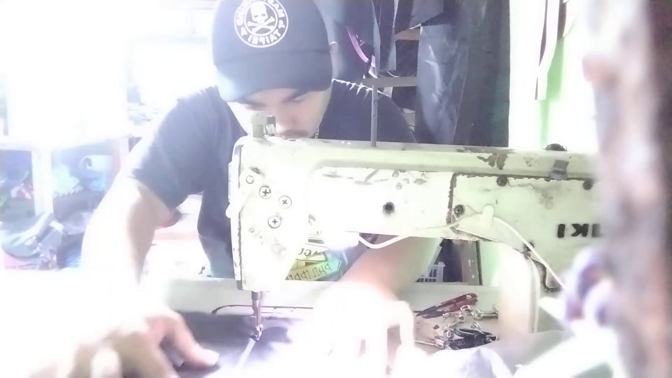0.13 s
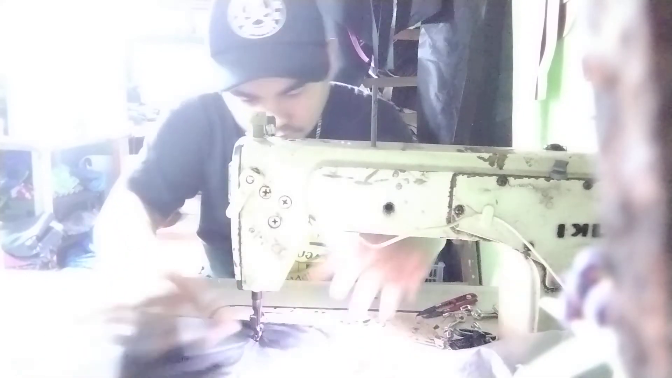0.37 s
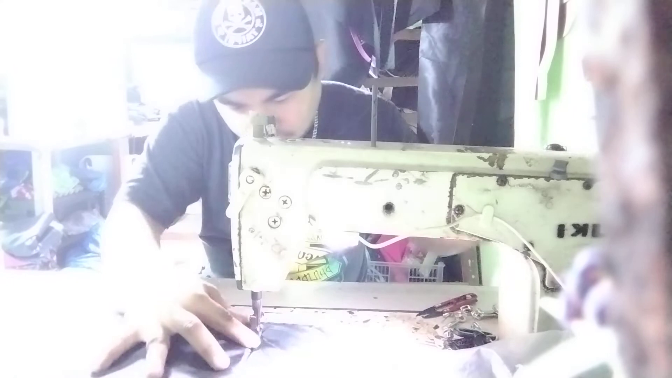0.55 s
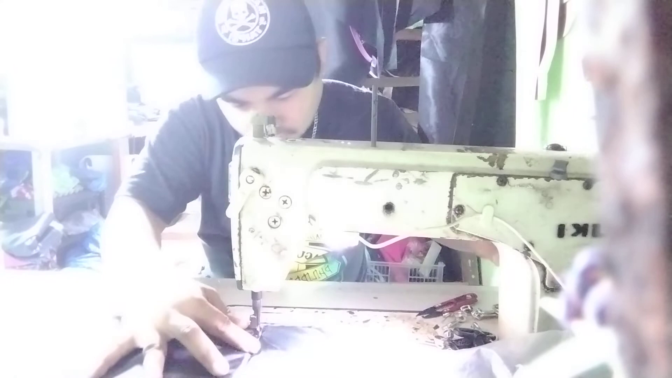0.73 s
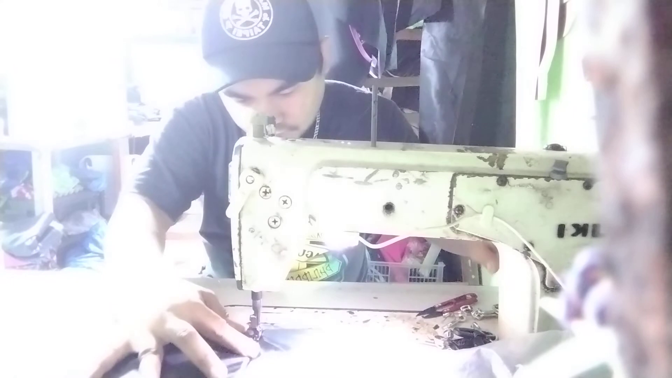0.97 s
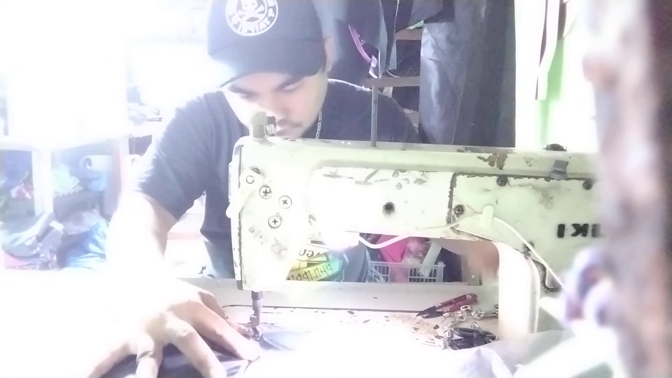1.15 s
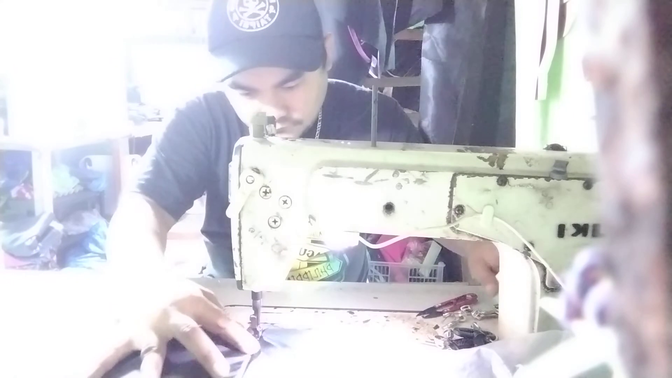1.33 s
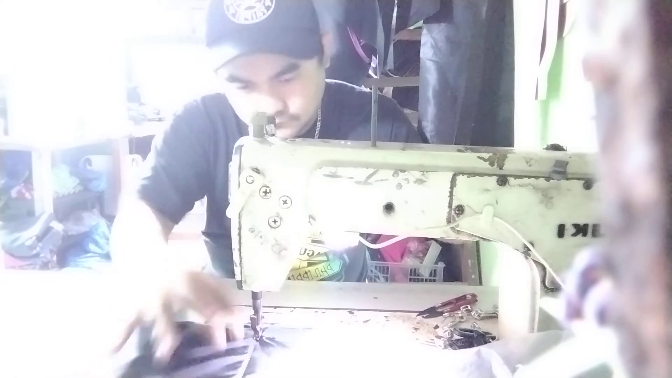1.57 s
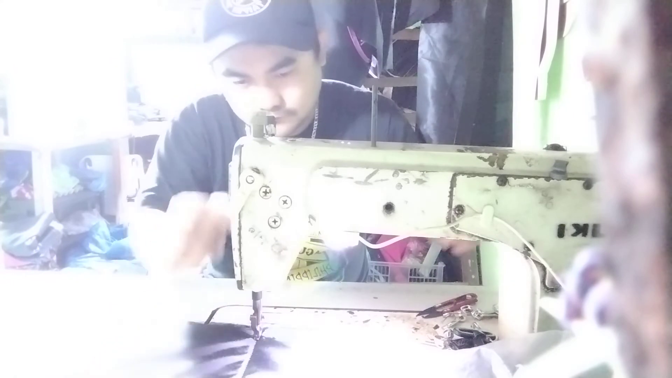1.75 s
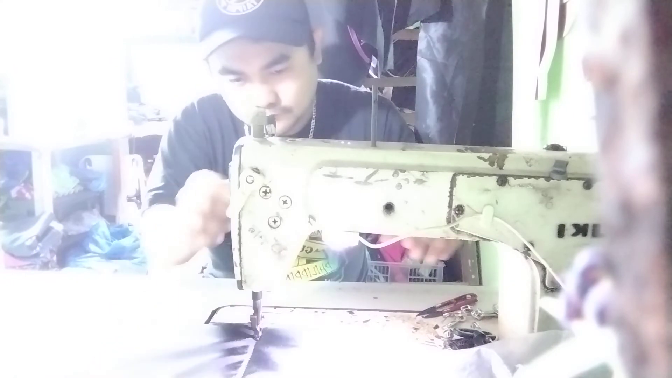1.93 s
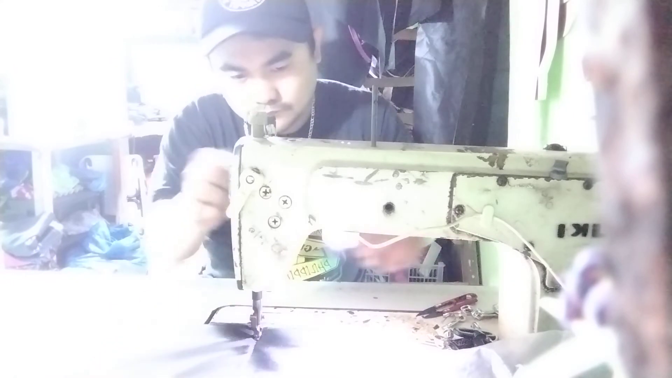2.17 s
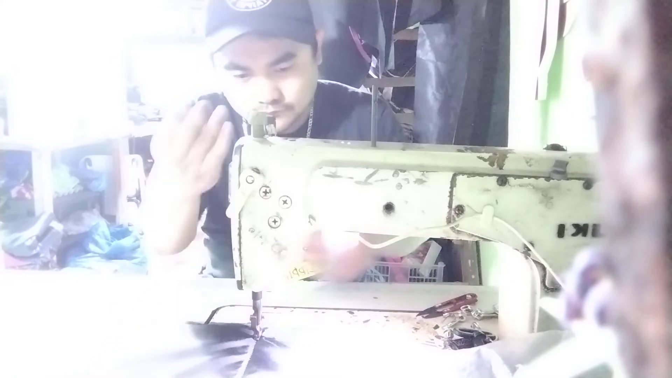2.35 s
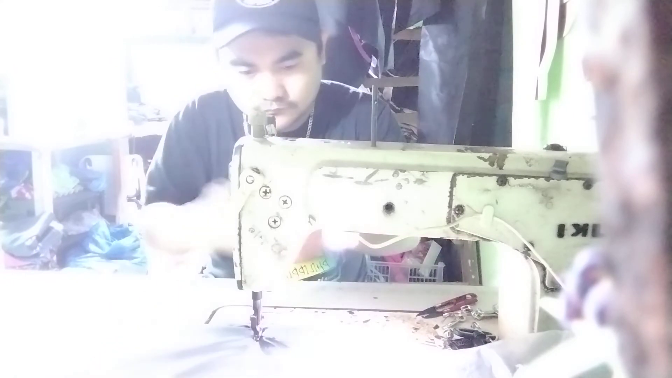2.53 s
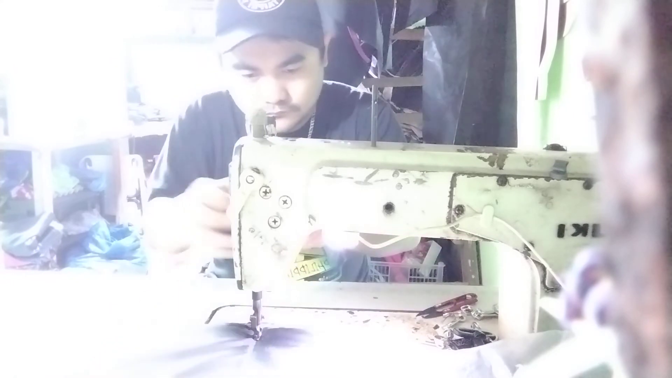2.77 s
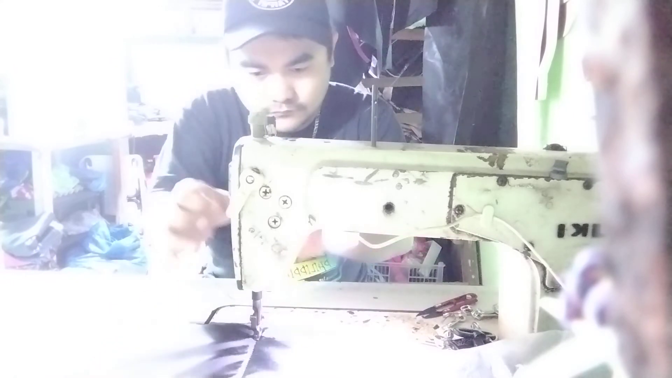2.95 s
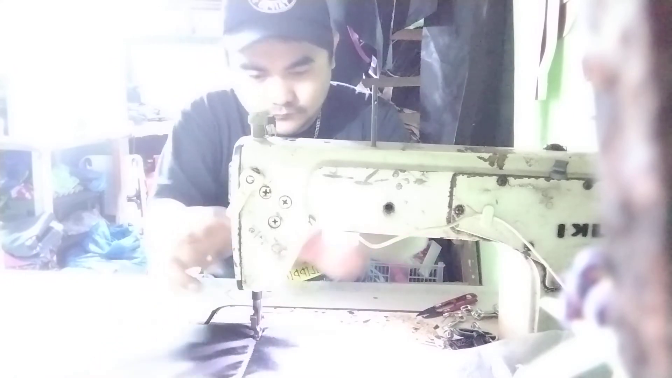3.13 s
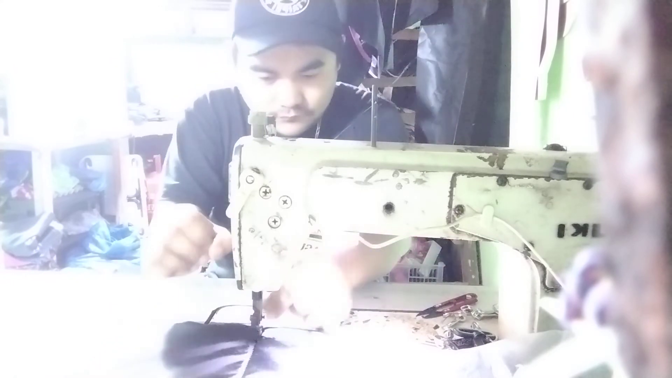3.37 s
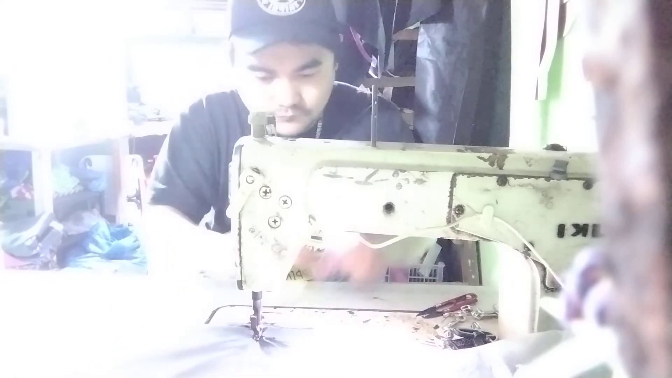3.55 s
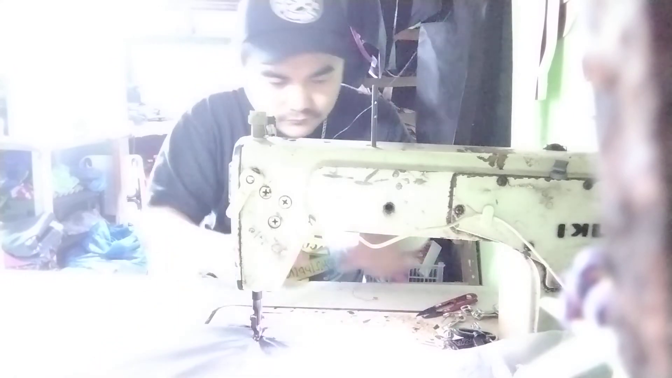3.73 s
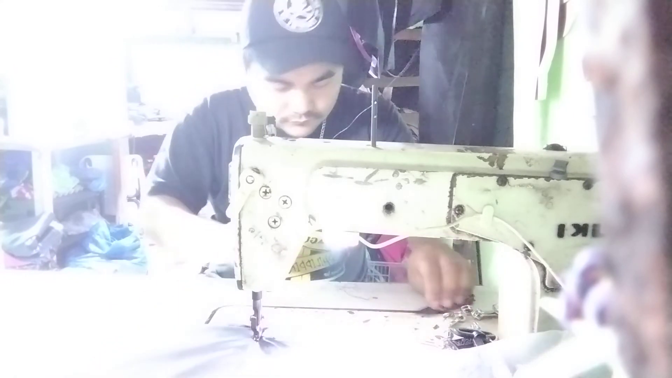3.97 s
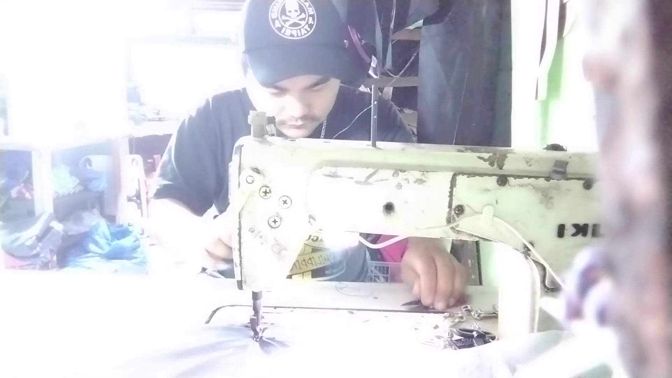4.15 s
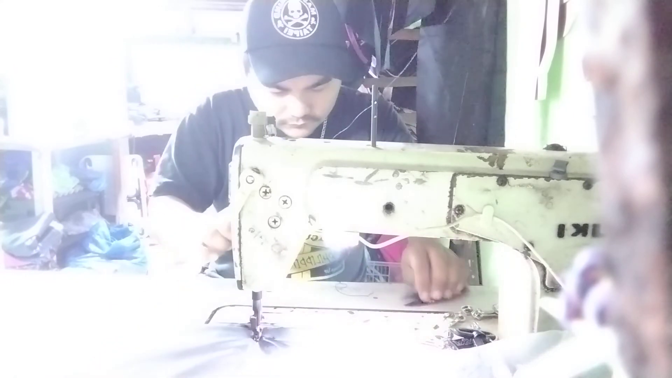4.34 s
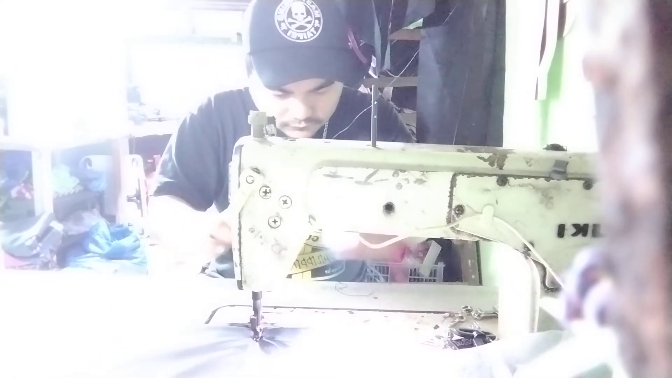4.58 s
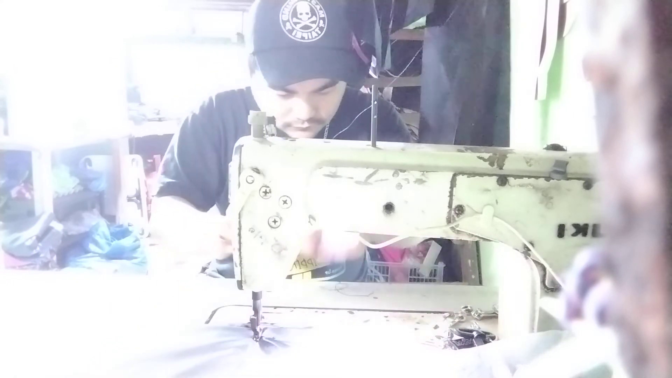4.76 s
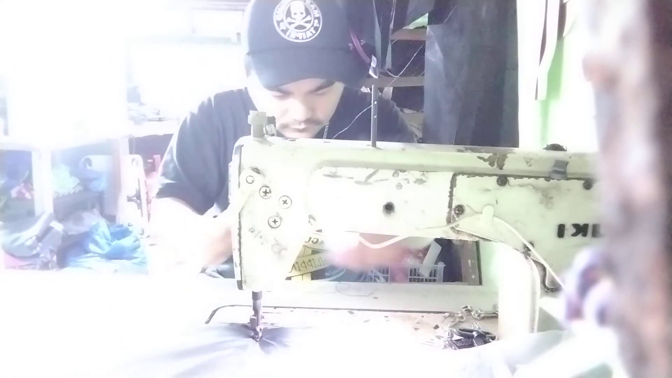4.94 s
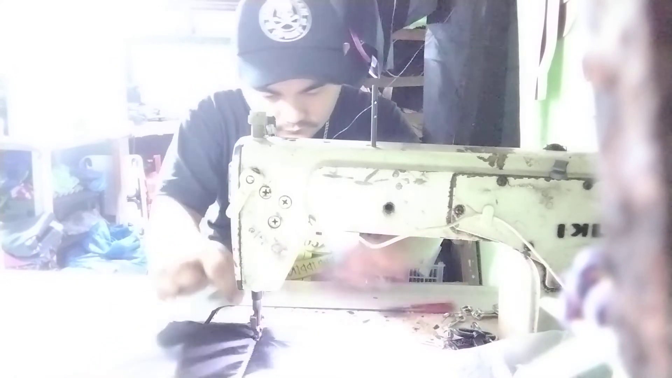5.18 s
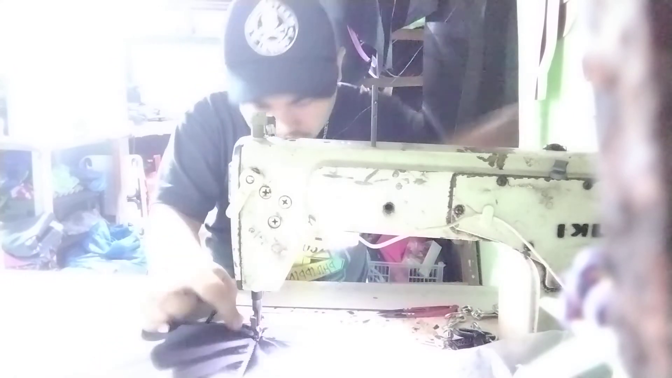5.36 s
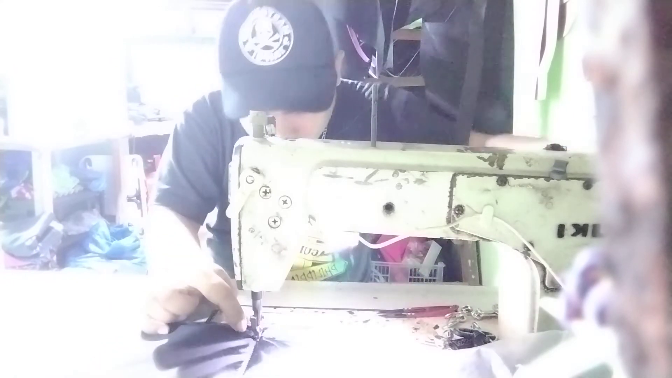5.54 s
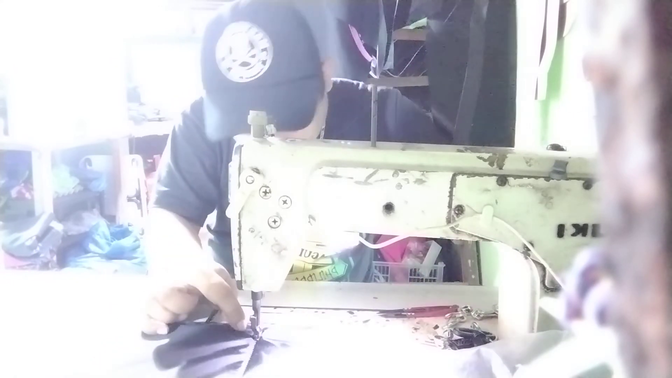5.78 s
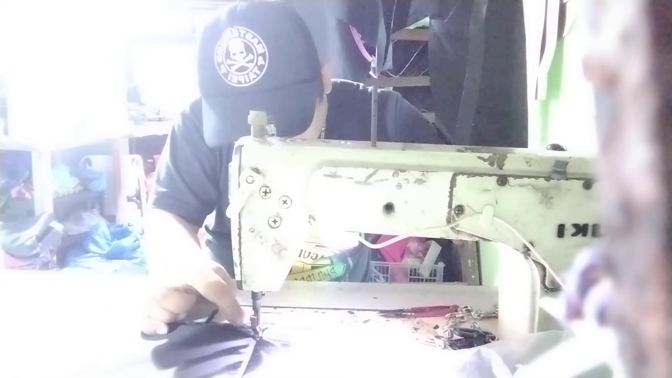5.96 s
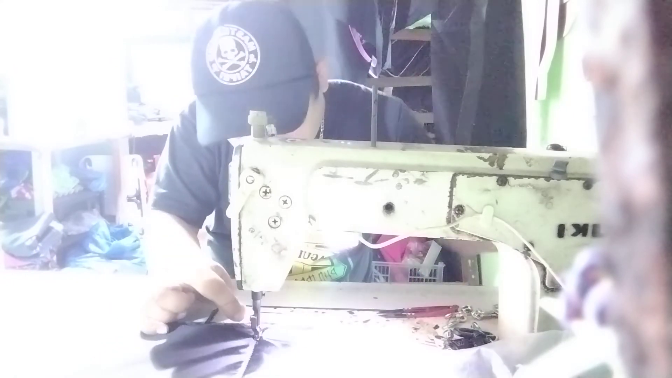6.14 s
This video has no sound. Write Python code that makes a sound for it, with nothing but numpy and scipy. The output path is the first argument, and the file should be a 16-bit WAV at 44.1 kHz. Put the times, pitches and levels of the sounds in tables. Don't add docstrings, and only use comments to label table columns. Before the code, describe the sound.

An industrial sewing machine rattles through a fast seam, stitches a slower clacking run and stops, leaving faint motor hum, hiss and scattered tool knocks.

```python
import sys
import numpy as np
from scipy import signal
from scipy.fft import rfft, irfft, next_fast_len
from scipy.io import wavfile
from scipy.ndimage import uniform_filter1d, map_coordinates

SR = 44100
rng = np.random.default_rng(int(sys.argv[2]) if len(sys.argv) > 2 else 0)


def boost(x):
    u = np.asarray(x, float) / 20
    return 10 ** u


def inscribe(sig):
    pcm = np.round(np.clip(np.atleast_2d(sig).T, -1, 1) * 32767)
    wavfile.write(sys.argv[1], SR, pcm.astype(np.int16))


N = 273420
TIME = np.arange(N) / SR
# (time [s], turns made [1])
FAST_SHAFT = [(-.006, 0), (.0494, 3), (.1606, 9), (.2165, 12), (.2552, 14), (.296, 16), (.321, 17),
              (.3796, 19), (.44, 20)]
FAST_END = FAST_SHAFT[-1][0]
# (time [s], peak level [dB], ring frequency [Hz])
SLOW_STITCHES = [(0.5856, -24, 2275), (0.688, -32, 1250), (0.7423, -7.5, 1540), (0.7864, -6.5, 1430),
                 (0.82, -6, 1187), (0.855, -5.5, 1785), (0.8907, -4.5, 1430), (0.927, -20, 1390),
                 (0.9652, -21, 1440), (1.0055, -21, 1510), (1.044, -12, 1734), (1.0874, -12, 1690),
                 (1.135, -37, 1310), (1.176, -28, 1870), (1.213, -20, 1750), (1.2893, -30, 1810),
                 (1.369, -26, 1845)]
# (time [s], level [dB])
FAST_PEDAL = [(0.0, -18.5), (0.16, -18.5), (0.334, -21.5), (0.526, -60), (0.596, -45), (0.66, -60)]
# (time [s], level [dB])
SLOW_PEDAL = [(0.689, -34.5), (0.752, -36), (0.796, -27.5), (0.842, -29.5), (1.108, -34.5), (1.238, -39.5),
              (1.454, -56), (1.8, -62)]
# (frequency [Hz], density [dB per Hz])
RATTLE_SPECTRUM = [(2060, -3.5), (3500, -17), (4290, 3.5), (5780, -2.5), (10100, 3), (11100, -5.5),
                   (14900, -13.5), (16000, -27)]
BRAKING_S = .24


def unit(x):
    return x / np.sqrt(np.mean(x ** 2) + 1e-20)


def along(points, hz):
    f, v = np.transpose(points)
    return np.interp(np.log(hz + 1), np.log(f + 1), v, left=-120, right=-120)


def curves(rows):
    s, *cols = np.transpose(rows)
    return [np.interp(TIME, s, c) for c in cols]


def filtered(x, response):
    m = next_fast_len(len(x) + 8192)
    return irfft(rfft(x, m) * response(np.fft.rfftfreq(m, 1 / SR)), m)[:len(x)]


def shaped(x, spectrum):
    return filtered(x, lambda hz: boost(along(spectrum, hz)))


def place(out, s, sound):
    out[round(s * SR):][:len(sound)] += sound


def bell(centre_hz, octaves):
    ripple = rng.standard_normal(200)

    def response(hz):
        modes = boost(3.5 * np.interp(hz / 120, np.arange(200), ripple))
        distance = np.abs(np.log2((hz + 1) / centre_hz) / octaves)
        return modes / np.sqrt(hz + 50) * np.exp(-.5 * distance ** 3)

    return response


def smoothed(field, bands, frames):
    return uniform_filter1d(uniform_filter1d(field, bands, axis=0), frames, axis=1)


def rush(spectrum, patchy_db, size=(2, 12), ceiling=4):
    z = signal.stft(rng.standard_normal(N), nperseg=512)[2]
    field = unit(smoothed(rng.standard_normal(z.shape), *size))
    x = signal.istft(z * boost(patchy_db * np.minimum(field, ceiling)), nperseg=512)[1][:N]
    return unit(shaped(x, spectrum))


def steady(x, sounding):
    return x / np.sqrt(np.abs(uniform_filter1d(x * x, 4000)) + 1e-3 * np.mean(x[sounding] ** 2))


def wobble(rate):
    return map_coordinates(rng.standard_normal(400), [TIME * rate])


def window(start, length, fade):
    return np.clip(np.minimum(TIME - start + fade, start + length + fade - TIME) / fade, 0, 1)


def shaft():
    s, turns = np.transpose(FAST_SHAFT)
    later = np.transpose(SLOW_STITCHES)[0]
    s = np.concatenate([s, later, [later[-1] + 0.45]])
    return s, np.concatenate([turns, turns[-1] + 1 + np.arange(len(later) + 1)])


def effort():
    # (time [s], length [s], level [dB])
    shakes = [
        (0.39, 0.18, 7.5),
        (0.72, 0.07, -8),
        (0.88, 0.075, 7),
        (1.224, 0.079, 6),
    ]
    casting_db, = curves(FAST_PEDAL + SLOW_PEDAL)
    speed = uniform_filter1d(np.gradient(np.interp(TIME, *shaft())) * SR, size=1500)
    drive_db = 0.34 * (casting_db + 30) + 0.64 * 20 * np.log10(np.abs(speed) / 27 + 0.027)
    shake_db = sum(db * np.exp(-.5 * ((TIME - s) / length) ** 2) for s, length, db in shakes)
    lag_s = 0.036
    thump_db = -37 + np.interp(TIME - lag_s, TIME, drive_db) + shake_db
    return casting_db, thump_db, -44.5 + 0.96 * (casting_db + 29.5)


def strikes(s, turns):
    # (share of turn [1], level [dB])
    contacts = [(0, 0), (.27, -4), (.58, -12), (.8, -13)]
    whole = np.arange(int(turns[-1]) - 1)
    blows = np.zeros(N)
    for share, db in contacts:
        at = np.interp(whole + share + rng.normal(0, 0.006, len(whole)), turns, s)
        strength = boost(db + rng.normal(0, 1.3, len(whole)))
        blows[np.clip(at * SR, 0, N).astype(int)] += (at > -.003) * strength
    return blows


def joint_chatter(blows, turn, s, turns):
    fast = TIME < FAST_END
    since = TIME - np.interp(np.floor(turn), turns, s)
    habit = rng.standard_normal(N)[(since * SR).astype(int)]
    alike = 0.64 * fast
    shake = np.where(fast, signal.lfilter([1], [1, -.994], blows), signal.lfilter([1], [1, -.997], blows))
    shake = unit(shake + np.where(fast, .11, .13) * shake.max())
    return shake * (alike * habit + np.sqrt(1 - alike ** 2) * rng.standard_normal(N))


def casting_response(f):
    # (frequency [Hz], width [Hz], level [dB])
    casting_modes = [(326, 20.4, 4.5), (529, 101, 1), (750, 80, 1), (900, 137, 1), (1326, 150, 6),
                     (1600, 132, 5.5), (1926, 250, 3.5), (2220, 102, 2.5), (2550, 280, -3),
                     (2900, 134, 2.5), (3165, 260, -3), (3750, 390, -6), (4220, 1160, -12.5)]
    modes = sum((-1) ** k * boost(db) * 1j * f * width / (hz * hz - f * f + 1j * f * width)
                for k, (hz, width, db) in enumerate(casting_modes))
    return modes / (1 + 1j * f / 4600) ** 2


def table_thump(turn):
    # (multiple of shaft speed [1], level [dB])
    shaft_orders = [(1, -12), (2, 2), (3, -11), (4, -3.5), (5, -11), (6, -17), (7, -4), (9, -10), (10, -1),
                    (14, -15), (17, -10.5)]
    # (frequency [Hz], density [dB per Hz])
    table_spectrum = [(18, -66), (48, 3), (68, -30), (97, -6.5), (129, -1), (283, -9.5), (324, -7.5),
                      (402, -4), (450, -2.5), (580, -21), (990, -120)]
    orders = sum(boost(db) * ((k < 8) | (TIME < FAST_END)) * np.sin(k * 2 * np.pi * turn + k * k)
                 for k, db in shaft_orders)
    loose_db = np.interp(TIME, [BRAKING_S, .36], [-8.5, -3.5])
    thump = boost(-3.5) * unit(orders) + boost(loose_db) * rush(table_spectrum, patchy_db=3.0)
    dull = filtered(thump, lambda hz: 1 / (1 + (hz / 294) ** 6) / (1 + (70 / (hz + 1)) ** 3))
    return np.where(TIME < FAST_PEDAL[-1][0], thump, dull)


def machine():
    s, turns = shaft()
    casting_db, thump_db, rattle_db = effort()
    turn = np.interp(TIME, s, turns)
    blows = strikes(s, turns)
    chatter = joint_chatter(blows, turn, s, turns)
    sounding = TIME < 1.5
    sewing = 2 * SR
    struck, loose = (np.pad(filtered(x[:sewing], casting_response), (0, N - sewing))
                     for x in (blows, chatter))
    struck = struck * boost(np.interp(TIME, [.33, .345, FAST_END, FAST_END], [14, 9, 7, -11]))
    casting = steady(unit(struck) + boost(3) * unit(loose), sounding)
    rattle = steady(shaped(chatter, RATTLE_SPECTRUM), sounding)
    thump = table_thump(turn)
    running = np.clip((1.8 - TIME) / 0.32, 0, 1)
    whole = running * (boost(casting_db) * casting + boost(rattle_db) * rattle + boost(thump_db) * thump)
    return filtered(whole, lambda hz: 1 / (1 + (75 / (hz + 1)) ** 4))


def stitches():
    # (frequency [Hz], peak level [dB])
    arm_modes = [(1340, -16), (1610, -6), (1850, -9), (3250, -16), (4050, -24.5)]
    out, t = np.zeros(N + SR), np.arange(2000) / SR

    def ring(hz, t60):
        return boost(-60 * t / t60) * (1 - np.exp(-t / 0.0025)) * np.sin(2 * np.pi * hz * t)

    for s, db, hz in SLOW_STITCHES:
        place(out, s, boost(db - 7.0) * ring(hz, 0.036))
    for s in np.interp(np.arange(1, 18), *np.transpose(FAST_SHAFT)[::-1]):
        eased_db = -3 * (s > BRAKING_S)
        stroke = sum(boost(db + eased_db + rng.normal(0, 3)) * ring(hz, 0.021) for hz, db in arm_modes)
        place(out, s, stroke)
        place(out, s + .005, boost(-7.5) * stroke)
    return out[:N]


def bed():
    out, t = np.zeros(N + SR), np.arange(5000) / SR
    effort_db, = curves(SLOW_PEDAL)
    draws = rng.standard_normal((len(SLOW_STITCHES), 2))
    for (s, *_), (size, pitch) in zip(SLOW_STITCHES[3:], draws):
        hz, t60 = 562 * (1 + .03 * pitch), 0.086
        ring = boost(-60 * t / t60) * (1 - np.exp(-t / 0.0031)) * np.sin(2 * np.pi * hz * t)
        place(out, s, boost(effort_db[round(s * SR)] + 5 + size) * ring)
    return out[:N]


def taps():
    # (time [s], peak level [dB], centre [Hz], width [octaves])
    sharp_taps = [(0.763, -19, 3500, 1.6), (.746, -28.5, 2900, 0.2), (.892, -24, 1700, 0.51),
                  (0.93, -37, 2740, 0.19), (1.046, -23.5, 2280, 0.29), (1.087, -21.5, 2060, 0.59),
                  (1.137, -29, 1680, 0.41), (1.186, -28, 5100, 1.7), (1.588, -31, 2500, 0.28),
                  (2.891, -24, 1980, 0.67), (2.907, -30, 1230, 0.89), (4.27, -25.5, 1600, 0.21),
                  (4.909, -28.5, 3100, 0.21), (5.171, -26, 2830, 0.12), (5.172, -33.5, 5100, 0.13),
                  (5.2, -17.5, 2000, 0.88), (5.2005, -21.5, 9700, 0.83), (5.2185, -30, 12100, .5),
                  (5.2335, -36, 9000, .5), (5.316, -42, 11000, .6), (5.279, -35, 2900, .2),
                  (1.5885, -31.5, 3300, 0.12), (5.2015, -15, 1900, 0.4), (5.279, -35, 2170, 0.46),
                  (5.383, -40.5, 1830, 0.035), (5.673, -22, 1790, 0.17)]
    out, t = np.zeros(N + SR), (np.arange(2048) - 512) / SR
    for s, db, hz, octaves in sharp_taps:
        returns = .25 * (t > 0) * boost(-60 * np.abs(t) / .02) * rng.standard_normal(len(t))
        tap = filtered((t == 0) + returns, bell(hz, octaves))
        place(out, s - 512 / SR, boost(db) * tap / np.abs(tap).max())
    return out[:N]


def blows_on_table():
    # (time [s], peak level [dB], centre [Hz], width [octaves], crack level [dB])
    ticks = [(0.687, -27, 1500, 0.88, -34.5), (0.763, -25.5, 2900, 0.46, -30),
             (.85, -26.5, 2960, 0.88, -32.5), (1.531, -40, 2200, 0.2, -41), (1.586, -34, 2130, 0.7, -41),
             (4.885, -37, 2860, 0.095, -67), (4.905, -43, 3270, 0.28, -38), (5.217, -31, 1730, 0.35, -27),
             (5.232, -45, 1500, .7, -49.5), (5.315, -50, 1790, 0.66, -40), (5.385, -38, 3400, 0.54, -45)]
    # (time [s], peak level [dB], centre [Hz], width [octaves], crack level [dB])
    clacks = [(.568, -28, 750, 0.43, -82), (.587, -33.5, 615, 0.54, -72), (0.698, -24, 376, 1, -70),
              (1.485, -34, 990, 0.3, -43.5), (1.549, -31.5, 925, 0.37, -43.5),
              (2.87, -24.5, 2330, 0.55, -49), (2.876, -19.5, 1080, 0.78, -34), (2.886, -32, 1700, 2, -58),
              (2.995, -38.5, 1600, 0.93, -65), (4.257, -30, 1680, 0.1, -60), (4.265, -28, 1480, 0.27, -45),
              (5.172, -29.5, 2630, 0.67, -36), (5.198, -20.5, 1400, 1.34, -24.5),
              (5.277, -26, 1380, 1.15, -35.5), (5.679, -29, 1750, 0.22, -43), (5.94, -22, 654, 0.14, -43),
              (6.034, -25.5, 653, 0.16, -45), (6.052, -41, 2200, 0.3, -40.5)]
    # (time [s], peak level [dB], centre [Hz], width [octaves], t60 [s])
    rings = [(1.137, -32.5, 290, 0.18, 0.64), (1.36, -39, 1740, 0.13, 1), (1.597, -34.5, 1950, 0.14, 0.4),
             (4.812, -50, 3300, 0.2, 0.15), (2.879, -27.5, 510, 0.28, 0.28), (5.278, -29, 1650, 0.15, 0.19),
             (5.201, -23, 1780, 0.87, 0.19), (5.157, -43, 2150, 0.14, .15),
             (1.586, -21.5, 1920, 0.14, 0.091), (4.006, -40, 1605, 0.08, 0.55),
             (4.817, -28.5, 842, 0.047, 0.2), (4.818, -32.5, 1114, 0.079, 0.48),
             (5.168, -32.5, 825, 0.1, 0.25), (5.345, -34, 1550, 0.073, 0.29),
             (5.376, -34.5, 937, 0.096, 0.19), (4.8, -43, 1130, 0.27, 0.12), (5.941, -25, 1004, 0.15, 0.33),
             (5.941, -28.5, 429, 0.087, 0.36), (5.951, -31, 1980, 0.12, 0.19),
             (5.937, -31.5, 1510, 0.059, 0.3), (6.04, -32, 890, 0.17, 0.51), (6.114, -28, 930, 0.16, 0.11)]
    return ([(s, db, hz, width, 0.21, crack_db) for s, db, hz, width, crack_db in ticks]
            + [(s, db, hz, width, 0.34, crack_db) for s, db, hz, width, crack_db in clacks]
            + [(s, db, hz, width, t60, db - 37) for s, db, hz, width, t60 in rings])


def knocks():
    # (frequency [Hz], density [dB per Hz])
    crack_spectrum = [(2060, -21), (3500, -27), (6700, -4.5), (8680, 18), (12800, 12), (14700, 9),
                      (15800, 16)]
    out, t = np.zeros(N + SR), np.arange(SR // 3) / SR
    for s, db, hz, octaves, t60, crack_db in blows_on_table():
        closing = 1 / (1 + (t / (1.08 * t60)) ** 6)
        tail = boost(-60 * t / t60)
        fall = (0.38 * boost(-60 * t / 0.058) + 0.59 * tail * closing) * (1 - np.exp(-t / 0.0024))
        grain = boost(2.6 * np.interp(t * 120, np.arange(80), rng.standard_normal(80)))
        band = filtered(rng.standard_normal(len(t)), bell(hz, octaves))
        levelled = band / np.sqrt(np.abs(uniform_filter1d(band ** 2, size=350)) + 0.27 * np.mean(band ** 2))
        bright = s < .9 or 5.1 < s < 5.33
        crack = unit(shaped(rng.standard_normal(len(t)), crack_spectrum if bright else RATTLE_SPECTRUM))
        crack_fall = boost(-60 * t / 0.023) + 0.16 * tail
        place(out, s, boost(db - 7) * levelled * fall * grain + boost(crack_db - 4.0) * crack * crack_fall)
    return out[:N]


def scissors():
    # (frequency [Hz], level [dB], t60 [s])
    scissor_modes = [(474, -6.5, 0.25), (807, -2, 0.23), (1050, -0.5, 0.19), (1606, -11.5, 0.62),
                     (1830, -14, 0.28), (2157, 2.5, 0.095), (2375, -7, 0.17), (2890, -1, 0.073),
                     (3300, -15, .14), (3890, -9, 0.1), (4680, -15, 0.12), (4970, -18, 0.097)]
    # (time [s], peak level [dB])
    landings = [
        (2.868, -38),
        (2.877, -36),
        (2.889, -33),
        (2.921, -42),
        (2.996, -47),
    ]
    out, t = np.zeros(N + SR), np.arange(SR // 3) / SR
    for s, db in landings:
        size, phase = rng.standard_normal((2, len(scissor_modes)))
        ring = sum(boost(level + 3 * g - 60 * t / t60) * np.sin(2 * np.pi * hz * t + 3 * p)
                   for (hz, level, t60), g, p in zip(scissor_modes, size, phase))
        place(out, s, boost(db) * ring * (1 - np.exp(-t / 0.0029)))
    return out[:N]


def lingers():
    # (time [s], length [s], frequency [Hz], rms level [dB], t60 [s])
    notes_left = [(.36, .03, 1310, -40, 0.55), (.43, 0.014, 2000, -47, 0.18), (.59, .02, 2500, -51, .5),
                  (1.32, 0.13, 1000, -48, .15), (1.555, 0.058, 1003, -44.5, .45),
                  (1.68, 0.18, 995, -59.5, .2), (1.39, .06, 1640, -51.5, .2), (1.4, .05, 1950, -57, 0.33),
                  (1.6, 0.018, 450, -53, 0.27), (1.62, .08, 1800, -57, .2), (2.645, .014, 2620, -51, .12),
                  (4.816, 0.011, 3650, -50.5, .1), (4.912, .007, 4400, -54, .05),
                  (4.893, .012, 2100, -59, .05), (5.316, .012, 1830, -50, .08), (5.8, .015, 470, -50.5, .1),
                  (5.325, .012, 750, -49, .08), (6.05, .012, 2800, -52.5, .15),
                  (5.952, 0.011, 2080, -50, .08), (6.13, 0.051, 980, -54, .3),
                  (3.17, 0.025, 2800, -60, 0.091)]
    out, t = np.zeros(N + SR), np.arange(SR // 2) / SR
    for s, length, hz, db, t60 in notes_left:
        drift, swell = (map_coordinates(knots, [t * 75]) for knots in rng.standard_normal((2, 40)))
        gate = np.clip(t / 0.0067, 0, 1) * boost(-60 * np.maximum(t - length, 0) / t60 + 4.5 * swell)
        phase = 2 * np.pi * hz * np.cumsum(1 + .015 * drift) / SR
        place(out, s, boost(db + 1.5) * gate * np.sin(phase))
    return out[:N]


def leaks():
    # (time [s], length [s], frequency [Hz], rms level [dB])
    leaking_bands = [(0.56, 0.012, 2270, -54), (0.579, 0.017, 2334, -40.5), (0.548, 0.009, 246, -47),
                     (.815, 0.035, 459, -30.5), (1.132, 0.052, 250, -36.5), (1.19, 0.033, 156, -39.5),
                     (1.49, 0.0075, 422, -49), (5.334, .015, 9230, -49), (5.336, .03, 12800, -68),
                     (5.67, 0.008, 547, -55), (5.868, .015, 2330, -60), (0.576, .008, 1260, -40.5),
                     (0.675, .008, 750, -36), (0.663, 0.016, 1200, -44), (1.333, 0.02, 2950, -58),
                     (1.472, 0.067, 981, -47), (1.375, 0.018, 2900, -53), (1.527, 0.016, 2325, -47),
                     (1.535, .015, 9250, -67), (1.696, 0.055, 1292, -53), (2.13, 0.083, 1026, -52.5),
                     (2.22, 0.064, 2310, -69), (2.293, 0.009, 428, -42), (2.324, 0.033, 700, -55),
                     (2.36, 0.013, 1014, -52), (2.776, 0.016, 423, -52.5), (3.16, 0.014, 850, -64),
                     (3.556, 0.015, 687, -51), (3.736, 0.043, 435, -48.5), (3.804, 0.083, 696, -52),
                     (4.006, 0.021, 837, -56), (4.008, 0.049, 2200, -63.5), (4.414, 0.0052, 433, -48),
                     (4.61, 0.025, 2350, -65), (5.55, 0.068, 1630, -57.5), (5.56, 0.027, 432, -47),
                     (5.567, 0.041, 2400, -63), (5.64, 0.1, 1010, -57), (5.801, 0.034, 1190, -55.5),
                     (5.794, 0.099, 2330, -70), (5.797, 0.082, 1650, -61), (5.805, 0.012, 474, -52.5),
                     (6.112, 0.0077, 1680, -61)]
    out, t = np.zeros(N + SR), np.arange(SR // 3) / SR
    for s, length, hz, db in leaking_bands:
        gate = np.clip(t / 0.0035, 0, 1) * boost(-60 * np.maximum(t - length, 0) / 0.13)
        band = filtered(rng.standard_normal(len(t)),
                        lambda f: np.exp(-.5 * ((f - hz) / (14 + 0.0097 * hz)) ** 2))
        grain = boost(2.3 * np.interp(t * 70, np.arange(30), rng.standard_normal(30)))
        place(out, s, boost(db) * gate * steady(band, t >= 0) * grain)
    return out[:N]


def whine():
    # (time [s], length [s], lower level [dB], upper level [dB])
    slot_opens = [
        (2.736, 0.49, -50, -55),
        (3.29, 0.25, -50.5, -65),
        (4.009, 0.083, -52, -52.5),
        (4.33, 0.045, -73, -58),
    ]
    on_s, off_s, shut_db = 1.6, 5.42, -30.5
    passing_db = shut_db * (1 - window(on_s, off_s - on_s, 0.037)) - 40 * (TIME < 1.3)
    lower = boost(-73 + passing_db) + sum(boost(db) * window(s, length, 0.049) ** 2
                                        for s, length, db, _ in slot_opens)
    upper = boost(-68 + passing_db) + sum(boost(db) * window(s, length, 0.064) ** 2
                                        for s, length, _, db in slot_opens)
    return lower, upper, boost(-60 + passing_db + 3.6 * wobble(14))


def motor():
    # (frequency [Hz], rms level [dB])
    mains_lines = [(120.5, -74.5), (241.4, -73), (176, -79), (290, -88), (716, -80.5), (1290, -77)]
    # (frequency [Hz], level [dB])
    slot_lines = [(1374.2, -2), (1434.4, -1), (1493, -34)]
    lower, upper, rough = whine()

    def tone(lines):
        return sum(boost(db + 2.0) * np.sin(2 * np.pi * hz * TIME + hz) for hz, db in lines)

    def flutter():
        return boost(4 * map_coordinates(rng.standard_normal(200), [TIME * 25]))

    bearing = rush([(1120, -42), (1160, -4.5), (1195, -4.0), (1225, -15.5)], patchy_db=-0.5)
    bearing = bearing + .7 * np.sin(2 * np.pi * 1195.5 * TIME)
    slots = lower * flutter() * tone(slot_lines[:1]) + upper * flutter() * tone(slot_lines[1:])
    return tone(mains_lines) + slots + rough * unit(bearing)


def holes(x, open_db):
    # (frequency [Hz], width [Hz], depth [dB per dB])
    shut_bands = [(4300, 150, 0.9), (4720, 90, 0.7), (7100, 110, 0.9), (7900, 300, 0.6), (13900, 1200, 1.2)]
    hz, t, z = signal.stft(x, SR, nperseg=512)
    opening = np.interp(t, TIME, open_db)
    field = unit(uniform_filter1d(rng.standard_normal(z.shape), size=80, axis=1))
    depth_db = .55 * np.clip(0.5 - opening, 0, 30)
    bands = sum(share * np.exp(-.5 * ((hz - centre) / width) ** 2) for centre, width, share in shut_bands)
    patches = unit(smoothed(rng.standard_normal(z.shape), 5, 16))
    shut_db = np.outer(bands, np.clip(-4.0 - opening, 0, 30)) * np.clip(1 + 1.1 * patches, 0, 2)
    return signal.istft(z * boost(-depth_db * np.clip(field, 0, 2) - shut_db), SR, nperseg=512)[1][:N]


def air():
    # (time [s], level [dB])
    opening = [(1.3, 0), (1.44, -2.5), (1.75, -8.5), (1.95, -10.5), (2.21, -4.5), (2.45, -7), (2.8, -6),
               (3.05, -7.5), (3.13, -12.5), (3.46, -21.5), (3.56, -8), (3.7, -14), (3.77, -3), (4.88, -0.5),
               (5.15, -3.5), (5.84, 2.5), (6.2, 0)]
    # (time [s], length [s], level over the hiss [dB])
    rustles = [(1.509, 0.005, 3), (1.543, 0.006, 10.5), (2.006, 0.015, 4.5), (2.3, 0.051, 1),
               (3.902, 0.024, 1), (4.28, 0.034, 1), (4.414, 0.04, 5.5), (4.623, 0.042, 0),
               (5.366, 0.044, 3.5), (5.717, 0.18, 3.5)]
    # (frequency [Hz], density [dB per Hz])
    floor_spectrum = [(18, -53), (30, -31), (70, -15.5), (109, -14), (194, -13.5), (243, -15.5),
                      (287, -12.5), (425, -4.5), (897, -17), (1190, -2.5), (1300, -26.5), (1460, -12),
                      (1540, -13), (2460, -22), (2600, -40), (3380, -67.5), (5720, -120)]
    hum_spectrum = [(280, -63.5), (350, -11), (430, 1), (480, -10.5), (560, -47.5)]
    fan_spectrum = [(1470, -63), (2500, -20.5), (2680, -1), (2800, 4), (4040, -3), (4300, -7), (4800, -5.5),
                    (6240, -20.5), (10600, -120)]
    hiss_spectrum = [(2650, -41), (4500, -19), (5550, -11.5), (6270, -7.5), (7010, -11.5), (8330, -11),
                     (9890, 1.5), (11100, -10), (12000, -17.5), (15600, -40), (22000, -120)]
    top_spectrum = [(6760, -51), (11500, -8.5), (13300, -5), (14900, -12.5), (15900, -3)]
    open_db, = curves(opening)
    draught = wobble(4.1) + 0.66 * wobble(10)
    cloth_db = sum(db * np.exp(-.5 * ((TIME - s) / length) ** 2) for s, length, db in rustles)
    hum_db = -65 + 0.05 * open_db + 0.63 * wobble(4.3)
    fan_db = -55.5 + 0.33 * open_db
    hiss_db = -55.5 + 0.2 * open_db + 0.91 * draught + cloth_db
    top_db = -64.5 + open_db + 1.6 * draught + .6 * cloth_db
    rest = boost(-64.0) * rush(floor_spectrum, patchy_db=5)
    rest = rest + boost(-100) * rush([(25, -18), (60, 7), (90, -11)], patchy_db=3)
    rest = rest + boost(hum_db) * rush(hum_spectrum, patchy_db=3.0)
    fan = boost(fan_db) * rush(fan_spectrum, patchy_db=4.5, size=(1, 45), ceiling=1.5)
    hiss = boost(hiss_db) * rush(hiss_spectrum[:-2] + [(11800, -18), (13500, -60)],
                               patchy_db=4.5, size=(1, 90), ceiling=-.3)
    top = boost(top_db) * unit(shaped(rng.standard_normal(N), top_spectrum))
    return rest + holes(fan + hiss + top, open_db)


def shuts(x):
    # (time [s], length [s], frequency [Hz], width [Hz], level [dB])
    fan_shuts = [(3.29, .05, 3000, 500, -16), (3.345, .075, 2780, 110, -14), (3.43, 0.11, 2980, 170, -10),
                 (3.63, 0.088, 2950, 130, -11), (3.78, 0.25, 2880, 110, -12), (3.17, .14, 3700, 200, -12),
                 (3.4, 0.14, 3750, 150, -8), (1.75, 0.21, 2820, 220, -9), (5.985, .05, 2750, 250, -10),
                 (3.1, .2, 4270, 150, -12), (3.4, .4, 4750, 100, -10), (1.38, .11, 2400, 200, -15)]
    hz, t, z = signal.stft(x, SR, nperseg=512)
    cut_db = 0
    for s, length, centre, width, db in fan_shuts:
        band = np.exp(-.5 * ((hz - centre) / width) ** 4)
        span = np.exp(-.5 * ((t - s - length / 2) / (length / 2)) ** 6)
        cut_db = cut_db + db * np.outer(band, span)
    return signal.istft(z * boost(cut_db), SR, nperseg=512)[1][:N]


def room(x):
    # (frequency [Hz], t60 [s])
    room_decay = [(150, 0.48), (1000, 0.49), (4000, 0.072), (12000, 0.55)]
    hz, t, z = signal.stft(rng.standard_normal(SR // 2), SR, nperseg=256)
    t60 = np.interp(hz, *np.transpose(room_decay))[:, None]
    tail = signal.istft(z * boost(-60 * t / t60), SR, nperseg=256)[1]
    return signal.fftconvolve(np.pad(x, (300, 0)), tail / np.linalg.norm(tail))[:N]


def scene():
    near = machine() + stitches() + bed()
    around = taps() + knocks() + scissors() + lingers() + leaks() + motor() + shuts(air())
    return (near + boost(-6.5) * room(near) + around)[None]


def band_limit(x):
    return signal.sosfilt(signal.butter(12, 16360, fs=SR, output="sos"), x)


def record(dry):
    ceiling = .62
    rounded = dry[0] / (1 + np.abs(dry[0] / ceiling) ** 4) ** (1 / 4)
    limited = filtered(rounded, lambda hz: hz < 15680)[None]
    return band_limit(limited)


dry = scene()
out = record(dry)
inscribe(out)
```